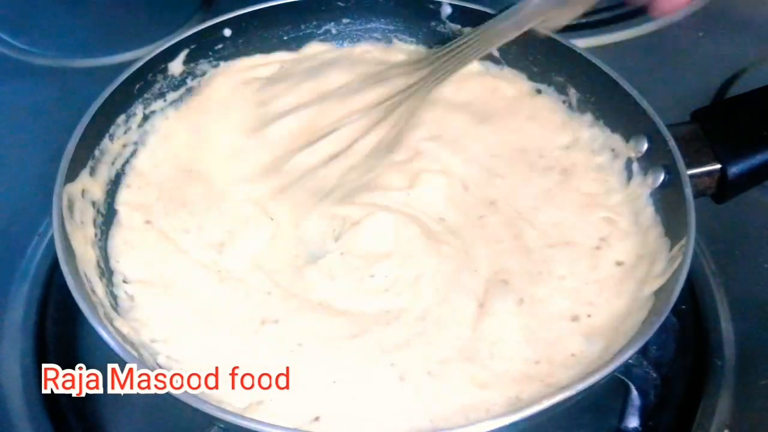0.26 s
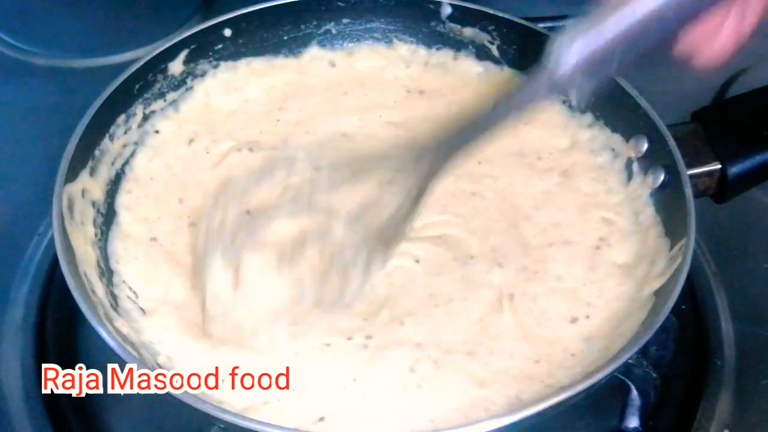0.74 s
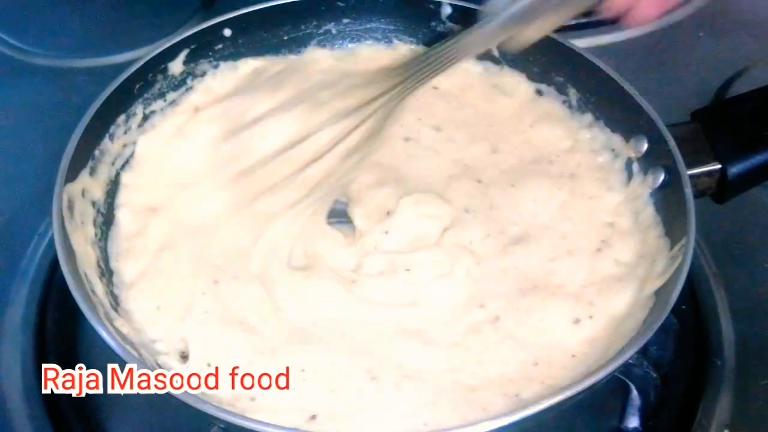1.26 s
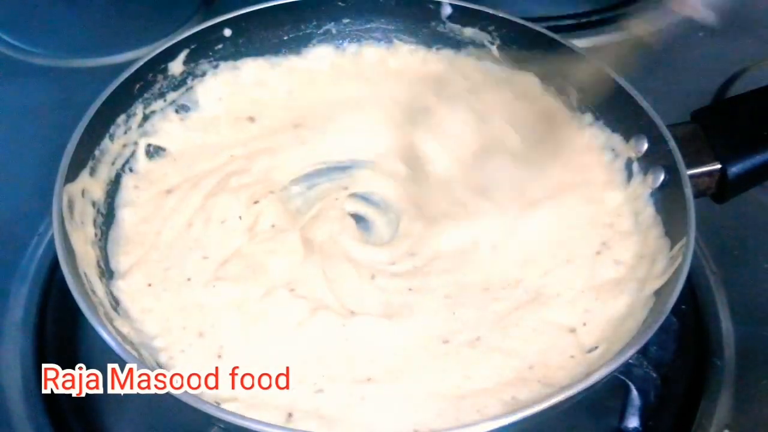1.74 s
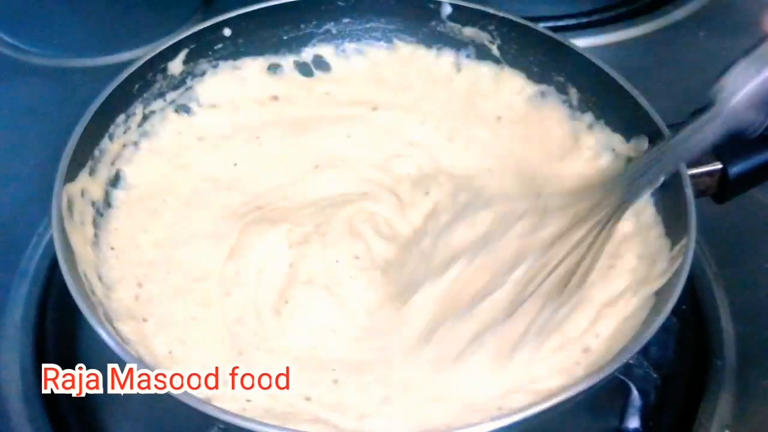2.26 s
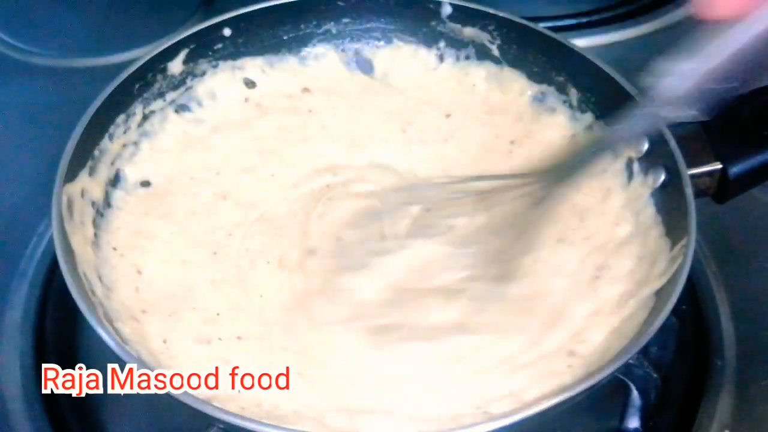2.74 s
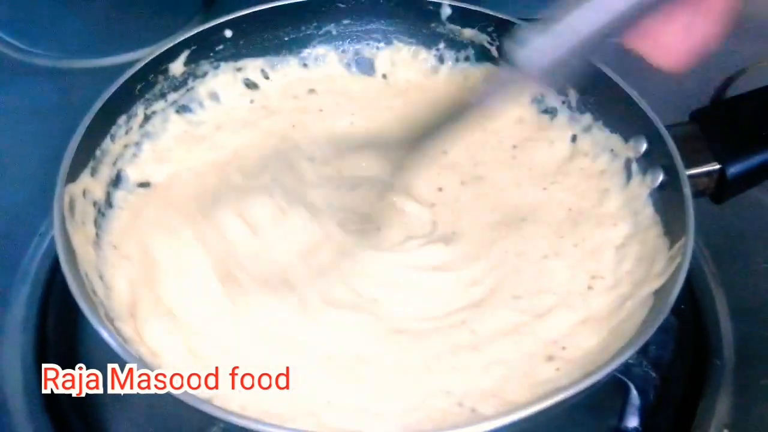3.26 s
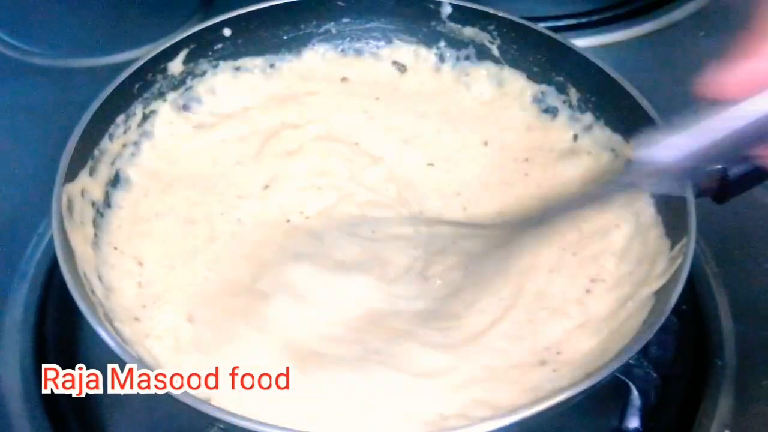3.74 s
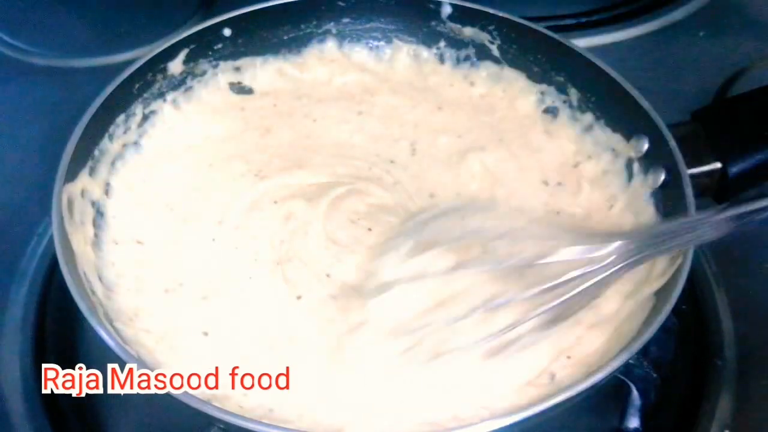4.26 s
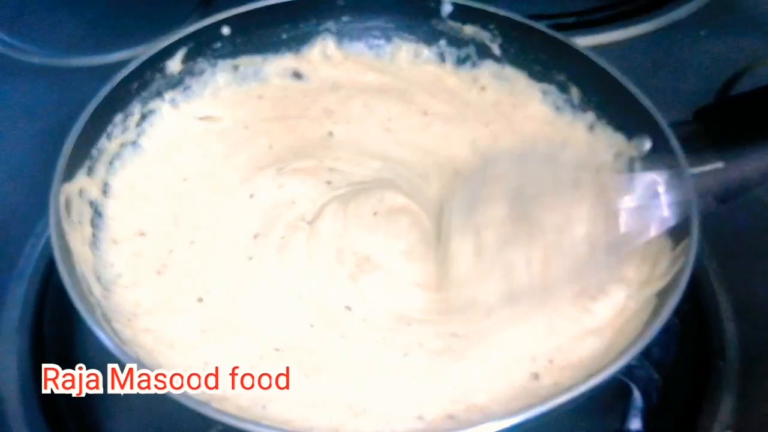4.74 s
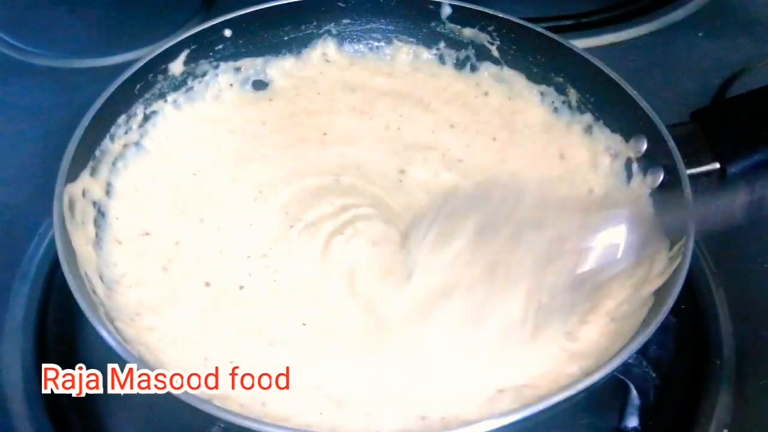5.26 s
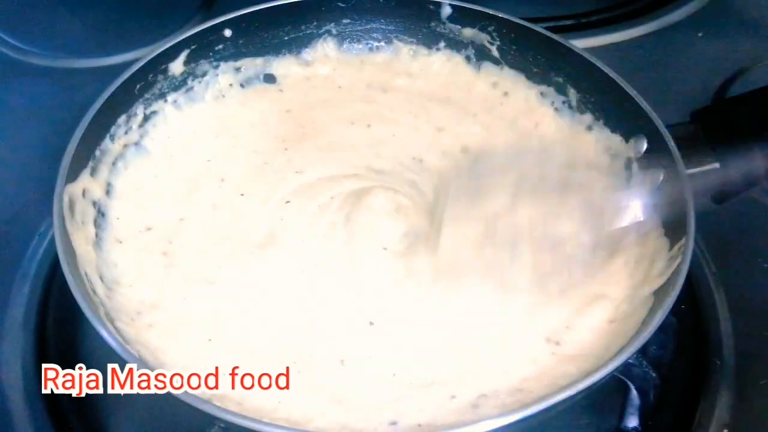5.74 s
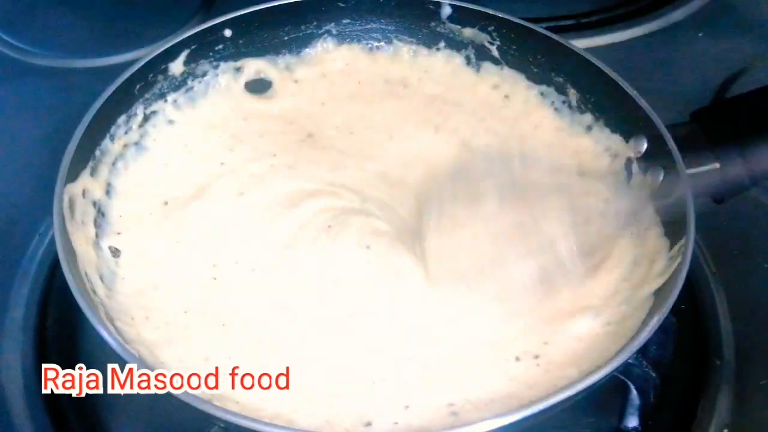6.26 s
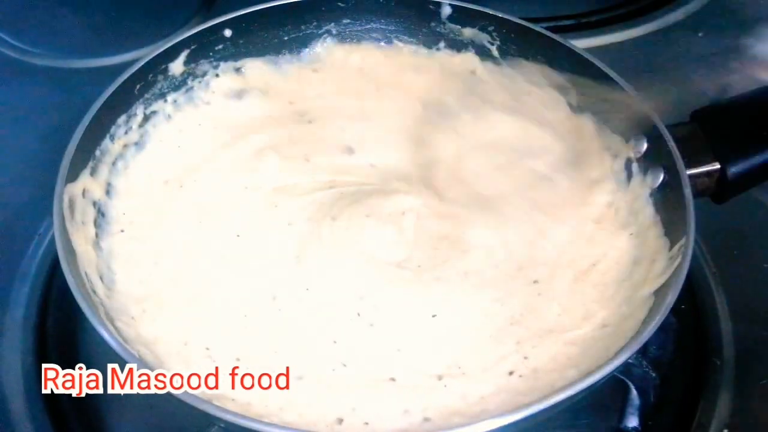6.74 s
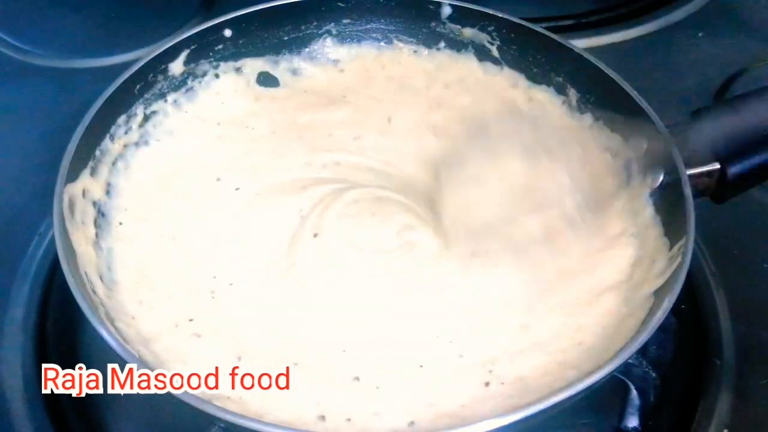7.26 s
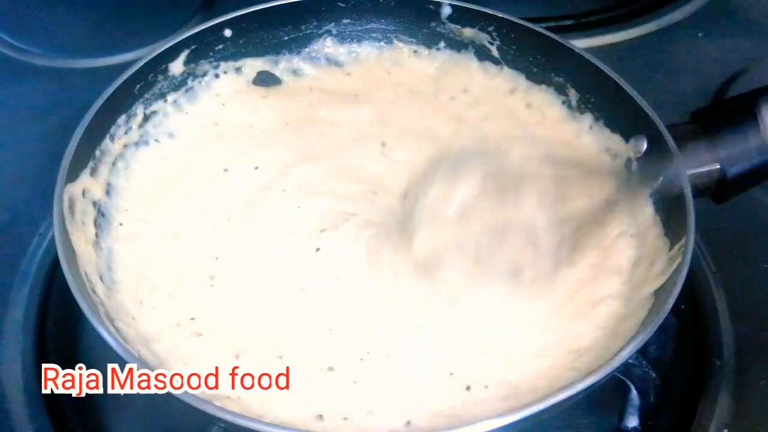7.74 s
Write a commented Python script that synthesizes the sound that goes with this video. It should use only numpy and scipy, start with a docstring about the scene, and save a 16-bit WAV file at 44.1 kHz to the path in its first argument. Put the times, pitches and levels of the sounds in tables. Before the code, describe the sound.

A metal whisk scrapes a frying pan in quick, uneven strokes, ticking against it while thick sauce softly squelches.

```python
"""A wire whisk stirs thick sauce in a nonstick frying pan, close up in a small kitchen.
Pressed down, the wires scrape in dense tiny slips that ring whisk and pan; gliding lightly they only
sing, and now and then one ticks against the pan's wall. Halfway the grip flattens and the resonances
shift. Underneath, the sauce squelches and plops, and the hot pan hums on the hob and faintly hisses."""
import sys
import numpy as np
from scipy import signal
from scipy.fft import rfft, irfft, next_fast_len
from scipy.io import wavfile
from scipy.ndimage import uniform_filter1d, map_coordinates

SR = 44100
rng = np.random.default_rng(int(sys.argv[2]) if len(sys.argv) > 2 else 0)


def log_audio(samples):
    """Write samples as a 16-bit WAV file to the path given in sys.argv[1]."""
    # one column per channel
    frames = np.atleast_2d(samples).T
    # limit to full scale, then quantise
    limited = np.clip(frames, -1, 1)
    pcm = np.round(limited * 32767).astype(np.int16)
    wavfile.write(sys.argv[1], SR, pcm)


N = 353241
TIME = np.arange(N) / SR
TOP_HZ = 14200


def amp(db):
    """Decibels to gain."""
    return np.exp(np.asarray(db) * (np.log(10) / 20))


def unit(x):
    """Scale to rms 1."""
    return x / np.sqrt(np.mean(x ** 2) + 1e-20)


def along(points, hz):
    """Read (hz, value) points on a log frequency axis."""
    f, v = np.transpose(points)
    return np.interp(np.log(hz + 1), np.log(f), v)


def curve(rows, t=TIME):
    """Breakpoints joined by straight lines."""
    return np.interp(t, *np.transpose(rows))


def wobble(rate):
    """Random modulation of rms 1, with rate knots a second."""
    knots = rng.standard_normal(int(N * rate / SR) + 2)
    return unit(np.interp(TIME * rate, np.arange(len(knots)), knots))


def swells(rows, rise_s, fall_s):
    """Bell-shaped gain swells around (peak_s, level_db) cues."""
    return np.sqrt(sum(amp(db) ** 2 * np.exp(-((TIME - s) / np.where(TIME < s, rise_s, fall_s)) ** 2)
                       for s, db in rows))


def filtered(x, response):
    """Static EQ: response(hz) gives the gain."""
    size = next_fast_len(N + 8192)
    return irfft(rfft(x, size) * response(np.fft.rfftfreq(size, 1 / SR)), size)[..., :N]


def moving_eq(x, response):
    """Automated EQ: response(hz, t) gives the gain."""
    hz, t, spectra = signal.stft(x, SR, nperseg=1024)
    return signal.istft(spectra * response(hz[:, None], t), SR, nperseg=1024)[1][:, :N]


def levelled(x, band_hz):
    """Scale so that the mono mix has rms 1 inside a band."""
    size = next_fast_len(N)
    hz = np.fft.rfftfreq(size, 1 / SR)
    inside = rfft(x.mean(0), size)[(hz > band_hz[0]) & (hz < band_hz[1])]
    return x / np.sqrt(2 * np.sum(np.abs(inside) ** 2) / (size * N))


def peaks(modes, hz):
    """Power response of steep-sided (pitch_hz, width_hz, level_db) resonances."""
    return sum(amp(db) ** 2 / (1 + ((hz - centre) / (0.92 * width)) ** 2) ** 2
               for centre, width, db in modes)


def noise(mono_share=0.046):
    """Stereo white noise with a share common to both ears."""
    white = rng.standard_normal((3, N), dtype=np.float32)
    return np.sqrt(mono_share) * white[0] + np.sqrt(1 - mono_share) * white[1:]


def snaps(per_s, decay_s):
    """Tiny stereo noise bursts of random time and size."""
    kicks = (rng.random(N) < per_s / SR) * np.minimum(rng.exponential(size=N), 3)
    return noise() * signal.lfilter([1], [1, -np.exp(-1 / (decay_s * SR))], kicks)


# Room tone EQ: freq_hz, gain_db
ROOM_TONE_EQ = [(20, 2.5), (50, -2), (110, -2.5), (200, -12), (400, -17), (900, -42), (2000, -30),
                (3000, -28), (3900, -36), (5300, -25), (7000, -30), (10000, -37), (14000, -47)]
# Fader ride on the pan's hiss, relative to the room tone: time_s, gain_db
HISS_RIDE = [(0, 6), (1.3, 1.5), (4.4, 5.5), (5.4, 1), (8, 4)]

def room_tone(level_db=-63, flicker_db=1.4):
    """The room's low rumble, and above it the faint hiss of the hot pan."""
    air = amp(level_db) * unit(filtered(noise(mono_share=0.42), lambda hz: amp(along(ROOM_TONE_EQ, hz))))
    rumble = filtered(air, lambda hz: 1 / (1 + (hz / 1000) ** 4))
    hiss = amp(curve(HISS_RIDE) + flicker_db * wobble(24)) * (air - rumble)
    return rumble + hiss


# Reverb decay by band: freq_hz, t60_s
KITCHEN_DECAY = [(200, 0.12), (2000, 0.53), (12000, 0.03)]

def kitchen_reverb(x):
    """A short diffuse tail from tiles and cupboards."""
    hz, t, spectra = signal.stft(rng.standard_normal((2, SR // 2)), SR, nperseg=256)
    tail = signal.istft(spectra * amp(-60 * t / along(KITCHEN_DECAY, hz)[:, None]), SR, nperseg=256)[1]
    return signal.fftconvolve(x, tail / np.linalg.norm(tail[0]), axes=1)[:, :N]


# Steady shaking, strongest as the flat whisk ploughs through deep sauce: time_s, level_db
HUM_RIDE = [(0, -70), (4.92, -73.5), (5.1, -56.5), (5.32, -60), (5.9, -56.5), (6.35, -56.5), (6.6, -62),
            (8, -62)]
# Shoves that rock the pan: peak_s, level_db
PAN_SHOVES = [(0.5, -56.5), (1.03, -63.5), (1.76, -62.5), (2.55, -61.5), (2.98, -57.5), (3.89, -57.5),
              (4.5, -61), (6.11, -54), (6.3, -55), (7.34, -54.5), (7.9, -63)]
# Low modes of the loaded pan: pitch_hz, width_hz, level_db
PAN_MODES = [(104, 17, -12.5), (162.7, 7, 5), (180.7, 17.6, 2), (329.4, 21, -10), (578, 11, -14)]

def pan_hum(drone_hz=176, trim_db=-4):
    """The whisk's drag shakes the heavy pan on the hob, and a shove rocks it harder."""
    hum_db = curve(HUM_RIDE)
    shake = np.hypot(amp(hum_db), swells(PAN_SHOVES, rise_s=0.047, fall_s=0.088))
    drone_gain = amp(hum_db + 1.7 * wobble(12))
    drone = np.sin(2 * np.pi * np.cumsum(drone_hz + 5 * wobble(10)) / SR)
    boom = unit(filtered(noise(mono_share=0.9), lambda hz: np.sqrt(peaks(PAN_MODES, hz))))
    return amp(trim_db) * (drone_gain * drone + shake * boom)


# Squelch EQ: freq_hz, gain_db
SQUELCH_EQ = [(60, -56), (200, 1.5), (350, 3), (600, 1.5), (1000, -2.5), (2000, -6), (6000, -10.5),
              (14000, -29)]
# The loops pull a big fold of sauce over: peak_s, level_db
SAUCE_FOLDS = [(0.05, -64.5), (0.49, -62), (0.85, -51.5), (1.47, -59), (1.98, -62), (2.96, -61), (3.2, -66),
               (3.77, -56.5), (4.23, -61), (4.77, -58), (5.2, -71), (7.04, -57), (7.5, -76), (7.97, -56)]

def sauce(drag, rest_db=-66.5, drag_db=-16.5):
    """The loops tear through thick sauce in uneven squelches, with tiny wet smacks as films snap."""
    lumps = noise(mono_share=0.23) * amp(2.35 * wobble(130) + 0.88 * wobble(22))
    squelch = levelled(filtered(lumps, lambda hz: amp(along(SQUELCH_EQ, hz))), band_hz=(260, 900))
    smacks = unit(filtered(snaps(per_s=52, decay_s=0.007), lambda hz: 1 / (1 + 1j * hz / 3000) ** 2))
    stirred = np.hypot(amp(rest_db), amp(drag_db) * drag)
    folded = swells(SAUCE_FOLDS, rise_s=0.042, fall_s=0.062)
    return np.hypot(stirred, folded) * (amp(-7) * squelch + amp(-13.5) * smacks)


# Air pockets bursting in the sauce: start_s, level_db, pitch_hz
AIR_POCKETS = [(0.077, -42, 352), (0.128, -48, 447), (0.479, -40, 397), (1.182, -49.5, 480),
               (2.937, -35, 1530), (4.527, -54, 1010), (4.568, -56, 700), (4.678, -45, 1600),
               (4.779, -44, 470), (5.185, -46, 805), (5.194, -42.5, 745)]

def plops(t60_s=0.016, chirp=6, trim_db=-2):
    """Each air pocket opens with a damped, rising note and a wet smack."""
    out, t = np.zeros(N + SR), np.arange(SR // 10) / SR
    for s, db, hz in AIR_POCKETS:
        note = np.sin(2 * np.pi * hz * t * (1 + chirp * t)) * amp(-60 * t / t60_s)
        wet = unit(signal.lfilter(*signal.butter(1, 1500, fs=SR), rng.standard_normal(len(t))))
        smack = wet * amp(-14 - 60 * t / 0.055)
        out[round(s * SR):][:len(t)] += amp(db + trim_db) * (note + smack)
    return out[:N]


def singing_wire(hz, relative_width=0.06, wander=0.01, stutter_db=2.6):
    """One wire mode kept ringing by faint slips: it stutters and strays as the contact travels."""
    knots = np.arange(0, N / SR + 1, 1 / (relative_width * hz))
    drift = np.interp(TIME, knots, rng.standard_normal(len(knots)) + 1j * rng.standard_normal(len(knots)))
    cycles = np.cumsum(hz * (1 + wander * wobble(20))) / SR
    tone = np.real(drift * np.exp(2j * np.pi * cycles) * np.array([[1], [1j]]))  # ears 90 degrees apart
    return unit(tone * amp(stutter_db * wobble(70)))


# Light glides between strokes: peak_s, level_db, pitch_hz, sub_octave_relative_db
WIRE_GLIDES = [(0.02, -58.5, 4800, -4.5), (0.08, -69.5, 4940, 3), (0.455, -70, 5180, -5),
               (0.52, -61, 4900, -4), (1.12, -65, 4900, 1.5), (2.98, -65.5, 5200, 0),
               (4.6, -67, 5420, -2.5), (5.05, -62, 4290, -10), (5.07, -61, 5370, -17)]

def glides(trim_db=1):
    """Barely touching, a wire sings in one thin mode and another an octave below."""
    out = np.zeros((2, N))
    for s, db, hz, sub_db in WIRE_GLIDES:
        tone = singing_wire(hz) + amp(sub_db) * singing_wire(hz / 2)
        out += swells([(s, db)], rise_s=0.064, fall_s=0.055) * tone
    return amp(trim_db) * out


# Ring of a struck wire: pitch_hz, level_db
CLINK_MODES = [(1470, -6.5), (1650, -10.5), (2460, -5.5), (2720, -10), (3430, -6), (4200, -12), (5080, 1),
               (5265, -3.5), (5650, -3), (6150, 7.5), (6620, 5.5), (6980, -1), (7470, 4), (8400, -23),
               (10200, -6.5), (11200, -14)]
# Wires hit the pan and skid on: start_s, tick_db, tick_t60_s, skid_db, body_relative_db
WIRE_LANDINGS = [ (0.54, -31, 0.034, -42, -14), (0.548, -33, .07, -49, -14), (0.662, -30, 0.078, -49, -6),
                 (0.728, -35, 0.065, -52, -15), (0.783, -34, .04, -50, 2), (0.924, -35, .04, -71, -22),
                 (1.321, -42, 0.015, -72, -3), (1.325, -37.5, 0.026, -68, 0), (1.333, -46, 0.03, -70, -3),
                 (1.413, -44, .08, -57, -20), (1.478, -26.5, 0.045, -51.5, 5), (1.578, -29, 0.051, -42, -9),
                 (1.85, -43, 0.088, -42.5, -2), (1.954, -27, 0.059, -53, -8), (2.017, -24, .07, -55, -9),
                 (2.107, -29.5, 0.075, -43.5, -5.5), (2.275, -27.5, 0.056, -43, -9),
                 (2.529, -39, 0.058, -51, 0.5), (2.537, -24, 0.11, -44, -8), (3.103, -43, 0.12, -51, -9.5),
                 (3.11, -35, 0.094, -50.5, -2), (3.369, -47, 0.092, -47, -8.5),
                 (3.533, -42, .087, -58.5, 0), (3.541, -39, 0.06, -55, -8), (4.669, -37, 0.08, -54.5, -6.5),
                 (4.68, -41, .03, -57.5, -1), (5.184, -37, 0.022, -70, -10), (5.195, -48, 0.027, -70, -10),
                 (5.767, -54, .1, -56, -18), (6.102, -40, .1, -53, -7), (6.581, -33.5, .1, -48, -9),
                 (7.303, -38.5, 0.13, -54, -3)]

def ticks(trim_db=-7.5, crack_db=-6, attack_s=0.0004):
    """A wire lands on the metal: a sharp crack and a clink of its modes, the high ones dying first."""
    out, t = np.zeros((2, N + SR)), np.arange(SR // 6) / SR
    mode_hz, mode_db = np.transpose(CLINK_MODES)
    count = len(mode_hz)
    damping = np.sqrt(mode_hz / mode_hz.mean())[:, None]
    attack = 1 - np.exp(-t / attack_s)
    for s, db, t60_s, _, body_db in WIRE_LANDINGS:
        hz = mode_hz * (1 + 0.0078 * rng.standard_normal(count))
        low_db = (4 + body_db / 2) * (mode_hz < 4500)  # a firmer landing brings out the low modes
        gain = amp(mode_db + low_db + 2 * rng.standard_normal((2, count)))
        phase = rng.random((2, count, 1))
        modes = np.sin(2 * np.pi * (hz[:, None] * t + phase)) * amp(-60 * damping * t / t60_s)
        clink = 2 * np.sum(gain[..., None] * modes, axis=1) / np.linalg.norm(gain) * attack
        snap = signal.lfilter(*signal.butter(2, 9000, fs=SR), rng.standard_normal((2, len(t))))
        crack = unit(snap) * amp(crack_db - 60 * t / 0.005)
        out[:, round(s * SR):][:, :len(t)] += amp(db + trim_db) * (clink + crack)
    return out[:, :N]


def glints(edge_gain, per_s=160, t60_s=0.035, level_db=-17, low_hz=7600, high_hz=13600):
    """Single wires flick off the pan during a stroke and ping in one high mode."""
    out, t = np.zeros((2, N + SR)), np.arange(SR // 20) / SR
    envelope = amp(-60 * t / t60_s) * (1 - np.exp(-t / 0.0011))
    for when, height, size, *phase in rng.random((int(per_s * N / SR), 5)):
        hz = low_hz + height * (high_hz - low_hz)
        gain = size * amp(-16 * np.log2(hz / low_hz))  # 16 dB softer per octave
        ping = envelope * np.sin(2 * np.pi * (hz * t + np.array(phase)[:, None]))
        out[:, int(when * N):][:, :len(t)] += gain * ping
    return amp(level_db) * edge_gain * unit(out[:, :N])


def snags(edge_gain, level_db=-17.5, highpass_hz=8500):
    """Wires snag on the coating and snap free: a crisp rasp on top of the scrape."""
    rasp = filtered(snaps(per_s=300, decay_s=0.0015), lambda hz: (1j * hz / (highpass_hz + 1j * hz)) ** 3)
    return amp(level_db) * edge_gain * unit(rasp)


# The whisk pressed along the pan:
# start_s, attack_s, release_after_s, level_db, body_relative_db, loop_pitch_hz, loop_level_db
WHISK_STROKES = [ (0.542, 0.053, 0.12, -42.5, -3.5, 1460, 6), (0.728, 0.0055, 0.14, -46, -6.5, 1520, 1),
                 (1.426, 0.072, 0.2, -41.5, -5.5, 1436, 2.5), (1.722, 0.017, 0.2, -59.5, 2.5, 1360, 7),
                 (1.83, .12, 0.18, -38, -7, 1426, -0.5), (2.164, 0.058, 0.043, -42.5, -8, 1280, 5),
                 (2.267, 0.083, 0.12, -39.5, -9.5, 1530, -11), (2.592, 0.061, 0.06, -45.5, -6.5, 1300, 10),
                 (2.673, 0.081, 0.14, -38, -8.5, 1530, -2.5), (3.104, 0.11, 0.15, -39.5, -6.5, 1660, -1),
                 (3.35, 0.039, 0.031, -53.5, 1.5, 1420, 1), (3.524, 0.054, .25, -43, -6, 1730, -2),
                 (3.846, 0.057, 0.13, -55, -2.5, 1560, 2), (3.938, 0.053, 0.12, -46, -3.5, 1430, 6.5),
                 (4.114, 0.14, 0.13, -42, -3, 1680, -4), (4.684, 0.074, 0.07, -54.5, -6.5, 1660, 4),
                 (4.759, 0.071, 0.16, -44, -4.5, 1960, 1.5), (5.447, 0.012, 0.013, -65.5, -1.5, 1660, -8),
                 (5.756, 0.12, 0.14, -42, -5, 1830, 0.5), (6.083, 0.09, 0.12, -38.5, -7.5, 1660, 0.5),
                 (6.27, 0.13, 0.22, -42.5, -4.5, 1860, -2), (6.594, 0.076, 0.14, -40, -7.5, 1620, 6),
                 (6.839, .08, 0.18, -41.5, -5, 1980, 3.5), (7.07, 0.045, 0.026, -46.5, -9, 1870, -5),
                 (7.206, 0.094, 0.089, -62, 4.5, 1550, 11), (7.361, 0.086, 0.18, -40.5, -7, 1940, 1.5),
                 (7.667, 0.092, 0.12, -42.5, -6.5, 1570, 5.5), (7.851, 0.095, 0.2, -43, -4, 1700, -2)]

def pressure(release_db_per_s=144.5, brake_db_per_s2=275,
             skid_attack_s=0.0053, skid_hold_s=0.03, skid_db_per_s=261):
    """Envelopes of the scrape's edge and body: every stroke and skid rises and dies away."""
    power, t = np.zeros((2, N + SR)), np.arange(SR) / SR
    contacts = []
    for s, attack_s, release_after_s, db, body_db, *_ in WHISK_STROKES:
        after = np.maximum(t - release_after_s, 0)
        fade_db = after * (release_db_per_s + brake_db_per_s2 * after)  # the hand eases off, ever faster
        contacts.append((s, np.minimum(t / attack_s, 1) * amp(db - fade_db), body_db))
    for s, _, _, db, body_db in WIRE_LANDINGS:
        fade_db = skid_db_per_s * np.maximum(t - skid_hold_s, 0)
        contacts.append((s, np.minimum(t / skid_attack_s, 1) * amp(db - fade_db), body_db))
    for s, gain, body_db in contacts:
        power[:, round(s * SR):][:, :SR] += (gain * amp([[0], [body_db]])) ** 2
    return np.sqrt(power[:, :N])


def bent_loops(hz, t, width_hz=120, overtone_ratio=1.825, overtone_db=-14.5):
    """Power response of the loops' two narrow modes: each stroke bends them to a new pitch and level."""
    starts, *_, pitches, levels = np.transpose(WHISK_STROKES)
    stroke = np.maximum(np.searchsorted(starts, t) - 1, 0)
    pitch_hz, db = pitches[stroke], levels[stroke]
    overtone = (overtone_ratio * pitch_hz, overtone_ratio * width_hz, db + overtone_db)
    return peaks([(pitch_hz, width_hz, db), overtone], hz)


# Grip automation: time_s, flatness (0 steep, 1 flat)
GRIP_RIDE = [(0, 0.22), (3.6, 0.085), (4.0, 0.9), (4.3, 0.98), (6.9, 0.89), (7.3, 0.87), (8, 0.56)]
# Whisk and pan resonances in each grip: pitch_hz, width_hz, level_db
STEEP_MODES = [(737, 70, -9), (1250, 120, -8), (1455, 110, -6), (2490, 170, 4.5), (2760, 160, 0),
               (3380, 340, -1.5), (4650, 280, -3), (5120, 400, 0), (6210, 650, 2.5), (7050, 650, 0.5),
               (8100, 380, -5), (9950, 800, -11), (13400, 900, -19)]
FLAT_MODES = [(590, 70, -10), (735, 60, -12), (1640, 110, -2), (2090, 130, -3.5), (2400, 150, -4),
              (2820, 330, 3), (3130, 280, -0.5), (4520, 450, -2), (5420, 280, 2), (6290, 750, 3),
              (6900, 490, 4.5), (8300, 420, 0), (10300, 1200, -12), (12000, 700, -17)]
# Broad grit under the resonances: freq_hz, level_db
GRIT_EQ = [(100, -55), (300, -20), (900, -17), (1500, -15), (2000, -17), (3850, -15), (5000, -19.5),
           (8000, -12), (11000, -17), (14000, -28)]
# Antiresonance between the wires' two groups of modes: flatness, notch_hz
GRIP_NOTCH = [(0, 4100), (1, 3590)]

def whisk_colour(hz, t, notch_db=-3, flat_extra_db=-12):
    """EQ of whisk and pan: a flatter grip crossfades the resonances and deepens two notches."""
    flat = np.clip(curve(GRIP_RIDE, t), 0, 1)
    modes = (1 - flat) * peaks(STEEP_MODES, hz) + flat * peaks(FLAT_MODES, hz)
    power = modes + bent_loops(hz, t) + amp(along(GRIT_EQ, hz)) ** 2
    notches = peaks([(curve(GRIP_NOTCH, flat), 310, 0), (1100, 220, -7)], hz)
    return np.sqrt(power) * amp((notch_db + flat_extra_db * flat) * notches)


def splay(edge_gain, lag_s=0.05, half_touching_db=-44):
    """Share of the wires that touch: a stroke starts on a few, and the rest join in under pressure."""
    pole = np.exp(-1 / (lag_s * SR))
    pressed = signal.lfilter([1 - pole], [1, -pole], edge_gain) ** 2
    return pressed / (pressed + amp(half_touching_db) ** 2)


def wire_groups(hz, t, touching, few_db=7, many_db=2.8, broad_db=1.9, life_s=0.06):
    """Groups of wires take turns on the pan; the fewer touch, the more bands swell and sink."""
    def ripple(spacing_hz):
        position = np.broadcast_arrays(hz / spacing_hz, t / life_s + hz / 1700)
        field = map_coordinates(rng.standard_normal((100, 170)), position, order=2, mode="wrap")
        return np.minimum(unit(field), 1.2)

    narrow, broad = ripple(170), ripple(520)
    narrow_db = few_db + (many_db - few_db) * np.interp(t, TIME, touching)
    # less ripple low down, where the pan's own modes hold steady
    reach = along([(1600, 0.6), (2600, 0.7), (4500, 1), (8500, 1), (11000, 0.6)], hz)
    return amp(reach * (narrow_db * narrow + broad_db * broad))


def wire_ring(slips, spacing_hz=100, t60_s=0.085, size=8192):
    """Narrow steel modes, heard differently at each ear, change as the contact points travel."""
    hop, t = size // 2, np.arange(size) / SR
    padded = np.pad(slips, ((0, 0), (hop, size)))
    fade, decay = np.sin(np.pi * np.arange(size) / size), amp(-60 * t / t60_s)
    out, count = np.zeros((2, N + 4 * size)), int(TOP_HZ / spacing_hz)
    for start in range(0, N + hop, hop):  # fresh modes for each overlapping grain
        hz = (np.arange(count) + rng.random(count)) * spacing_hz
        gains = rng.choice([-1, 1], (2, count)) * amp(2 * rng.standard_normal((2, count)))
        spectrum = np.zeros((2, hop + 1))
        spectrum[:, (hz * size / SR).astype(int)] = gains
        modes = irfft(spectrum * np.array([[1], [1j]])) * decay
        grain = signal.fftconvolve(padded[:, start:start + size] * fade, modes, axes=1)
        out[:, start:start + grain.shape[1]] += grain
    return unit(out[:, hop:hop + N])


def scrape(edge_gain, body_gain, crossover_hz=3900):
    """Dense micro-slips ring whisk and pan, and flutter as each wire catches and lets go."""
    slips = noise(mono_share=0.59) * amp(2.06 * wobble(900))
    touching = splay(edge_gain)
    ring = moving_eq(wire_ring(slips), lambda hz, t: whisk_colour(hz, t) * wire_groups(hz, t, touching))
    # level it out: the hand's pressure sets the power, whichever wires happen to ring
    ring = ring / np.sqrt(np.abs(uniform_filter1d(np.mean(ring ** 2, axis=0), size=1300)) + 1e-12)
    lows = filtered(ring, lambda hz: 1 / (1 + (hz / crossover_hz) ** 12))
    body = amp(0.7) * body_gain * levelled(lows, band_hz=(1100, 3600))
    edge = amp(-0.64) * edge_gain * levelled(ring - lows, band_hz=(4000, 12000))
    flutter = amp(0.27 * wobble(250) + 0.3 * wobble(70))
    return flutter * (edge + body)


# Stereo balance of the close sounds: freq_hz, left_minus_right_db
STEREO_TILT = [(500, -1), (2400, -1), (3300, -2), (4100, -2), (5200, -2), (6400, -7.5), (7200, -4),
               (7800, -1.5), (8600, 3), (9700, 1.5), (10600, -0.5), (12000, -1)]

def scene(reverb_db=-14):
    """Whisk and sauce up front, coloured differently at each ear, over pan hum and room tone."""
    edge_gain, body_gain = pressure()
    whisk = scrape(edge_gain, body_gain) + snags(edge_gain) + glints(edge_gain) + glides() + ticks()
    close = whisk + plops() + sauce(drag=body_gain)
    close = filtered(close, lambda hz: amp(np.array([[0.5], [-0.5]]) * along(STEREO_TILT, hz)))
    return close + amp(reverb_db) * kitchen_reverb(close) + pan_hum() + room_tone()


def record(dry):
    """A brick-wall low-pass on the mix."""
    return filtered(dry, lambda hz: hz < TOP_HZ)


dry = scene()
out = record(dry)
log_audio(out)
```